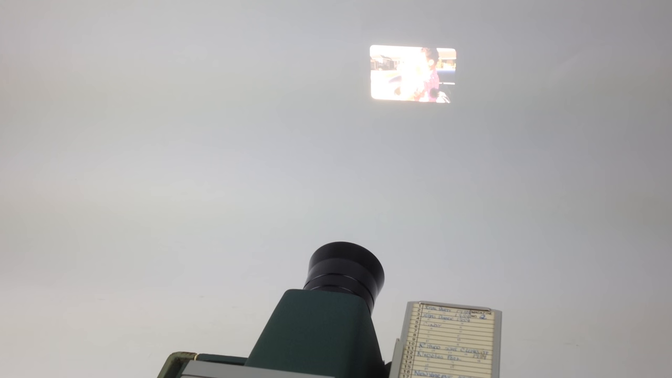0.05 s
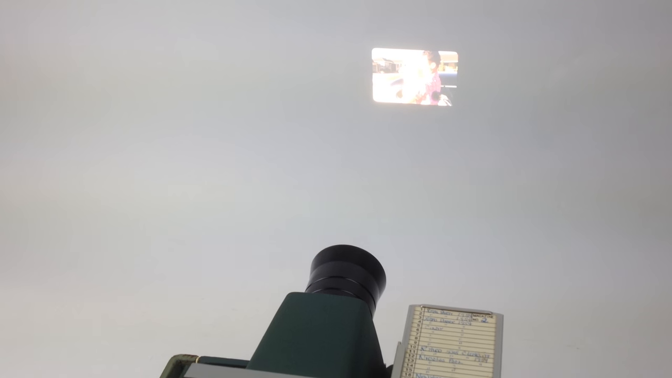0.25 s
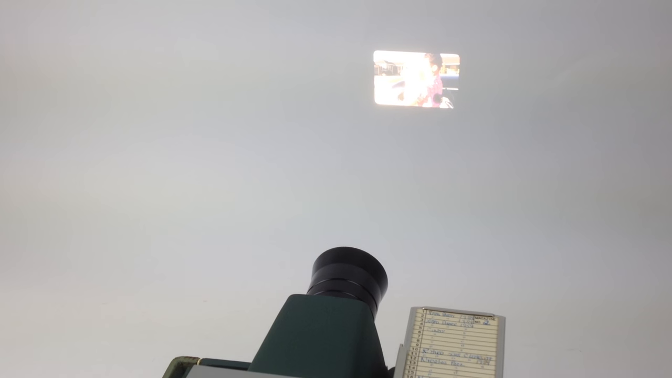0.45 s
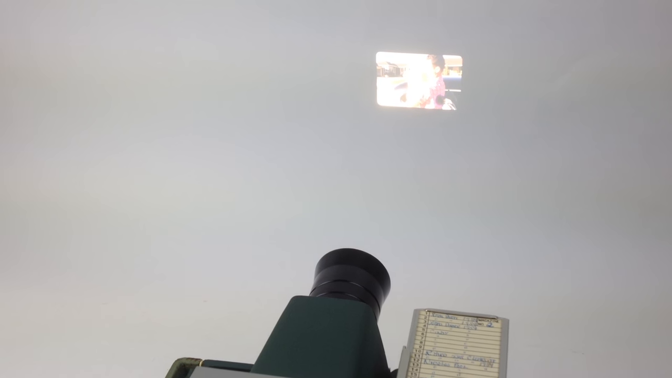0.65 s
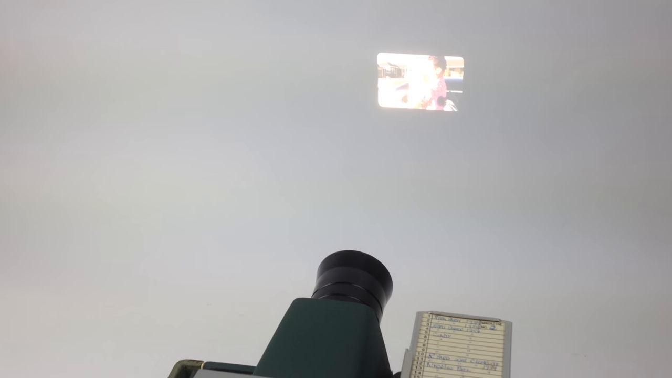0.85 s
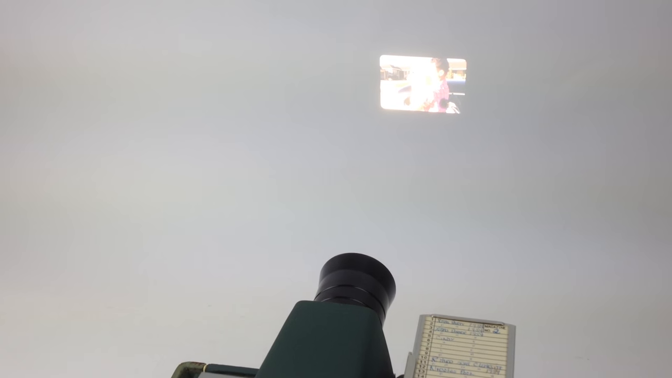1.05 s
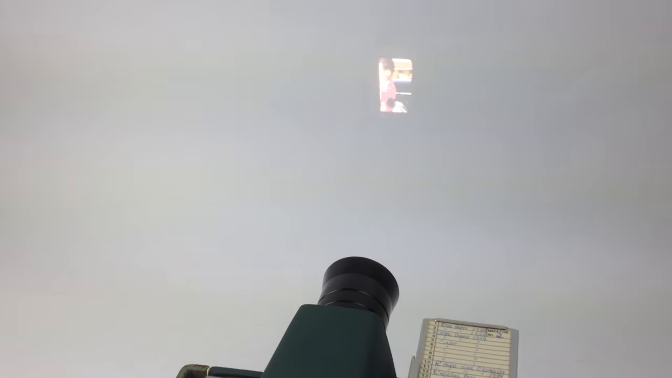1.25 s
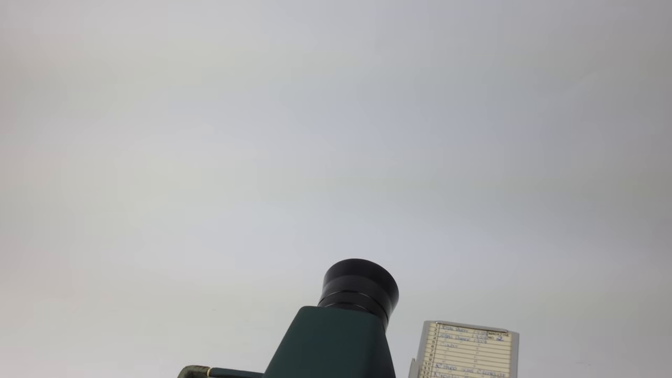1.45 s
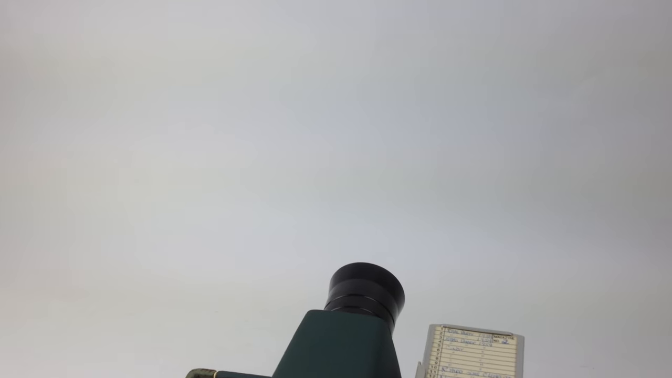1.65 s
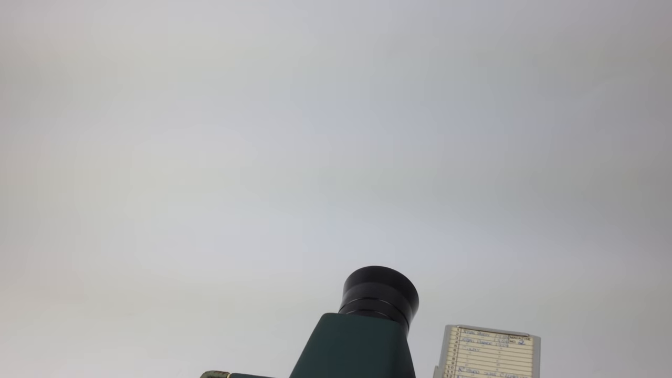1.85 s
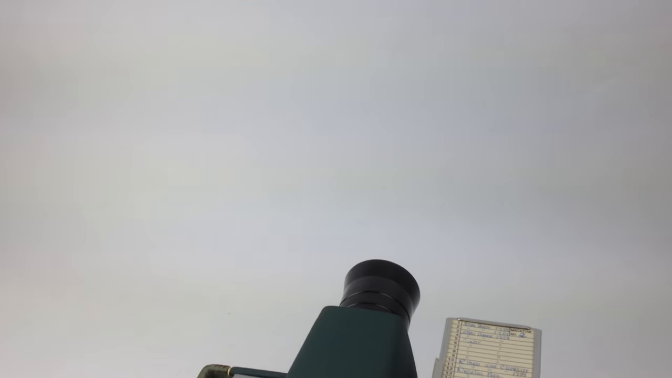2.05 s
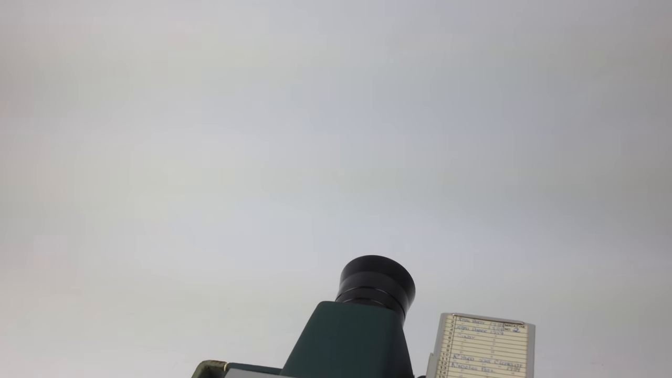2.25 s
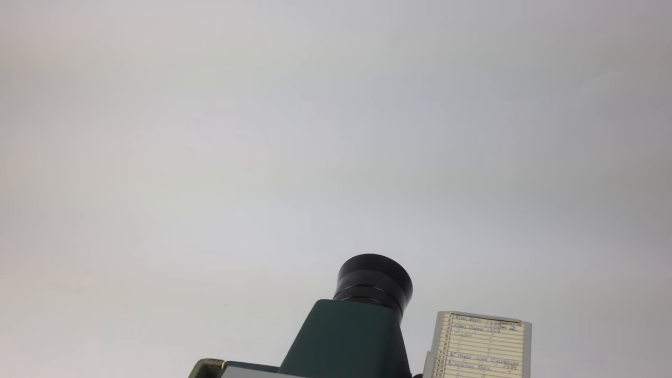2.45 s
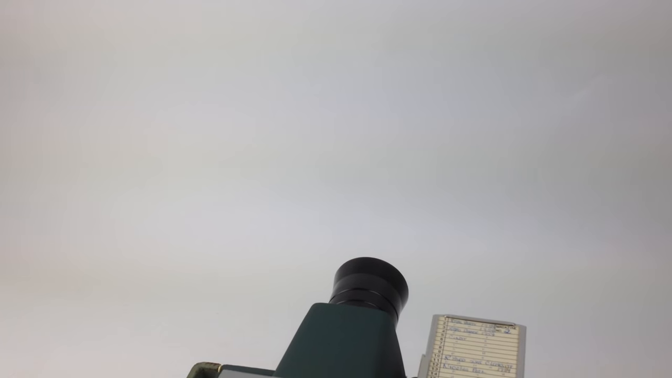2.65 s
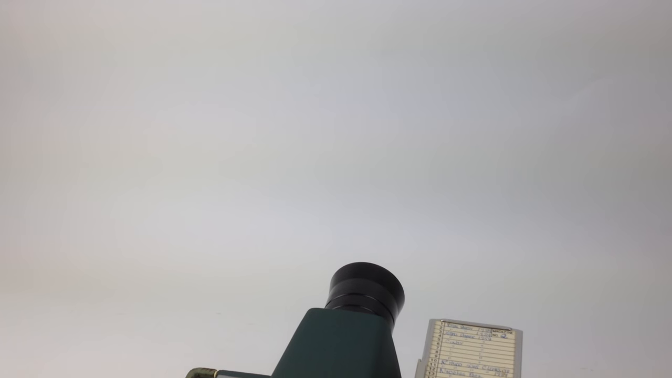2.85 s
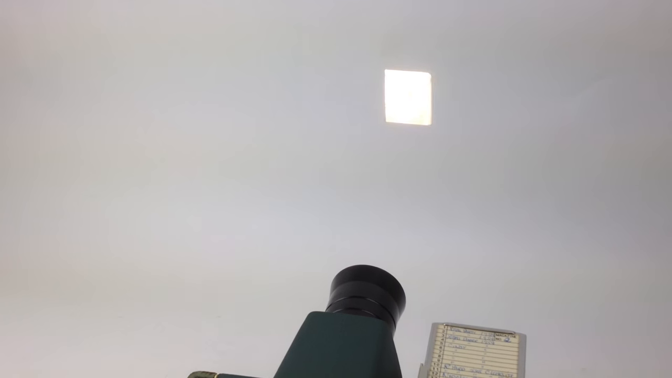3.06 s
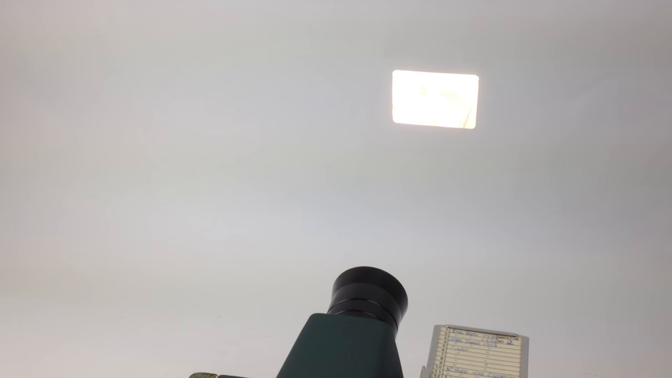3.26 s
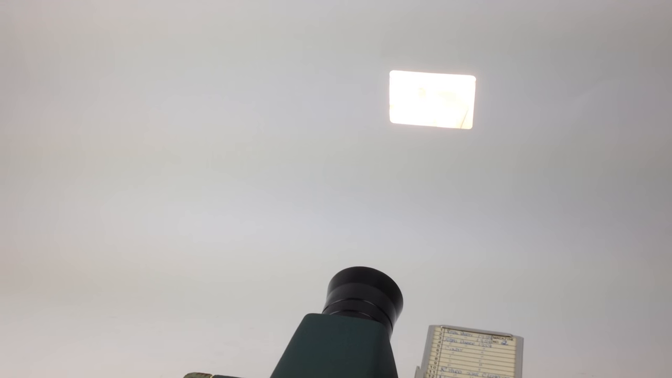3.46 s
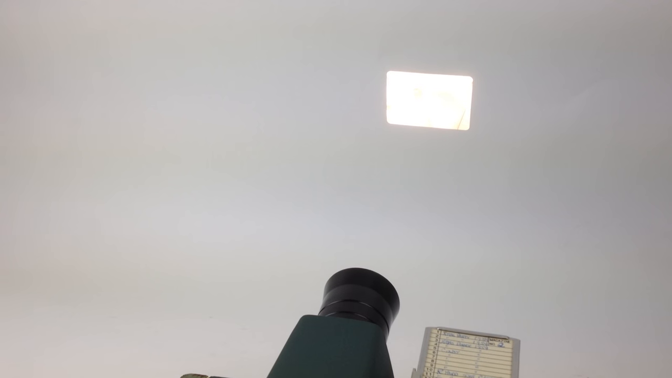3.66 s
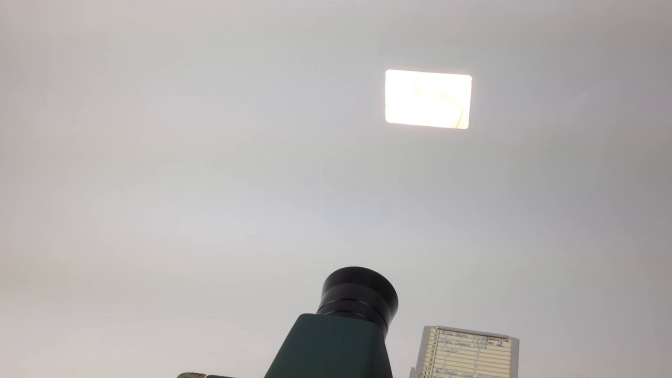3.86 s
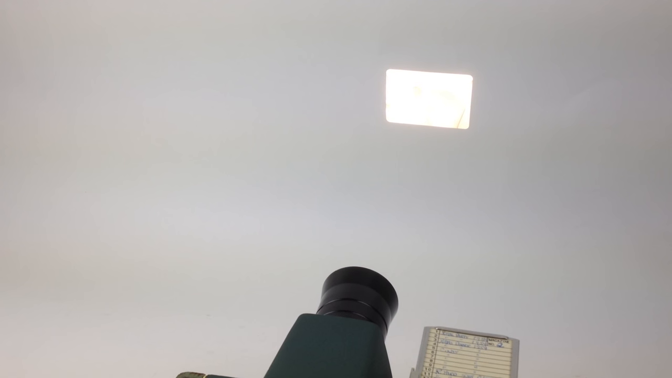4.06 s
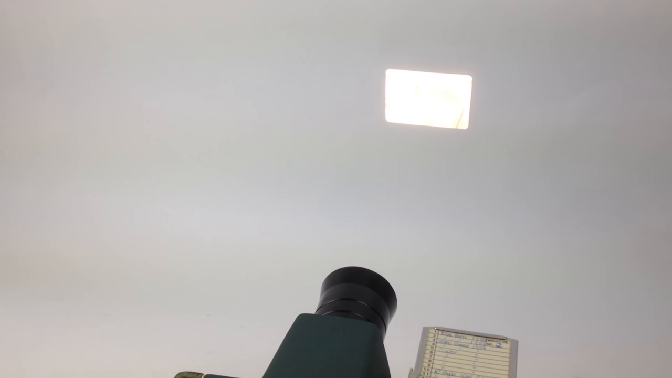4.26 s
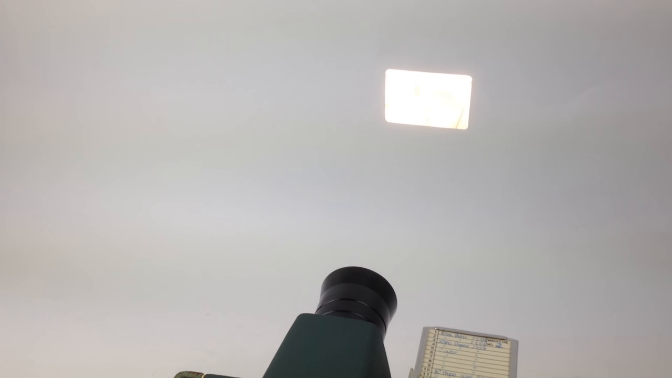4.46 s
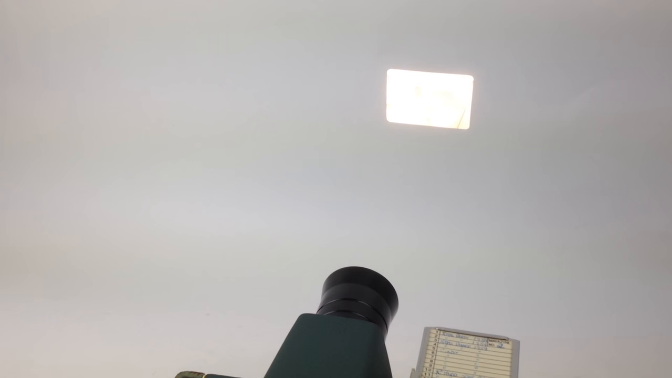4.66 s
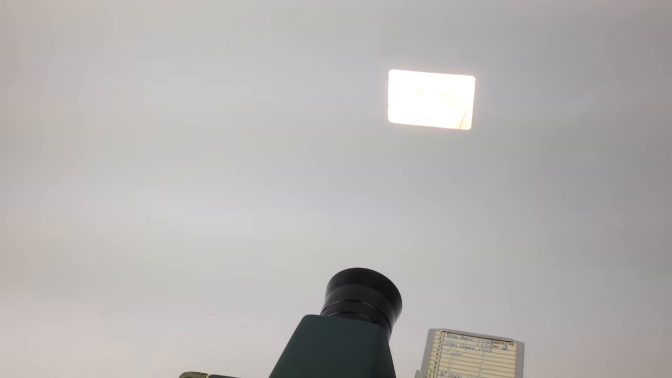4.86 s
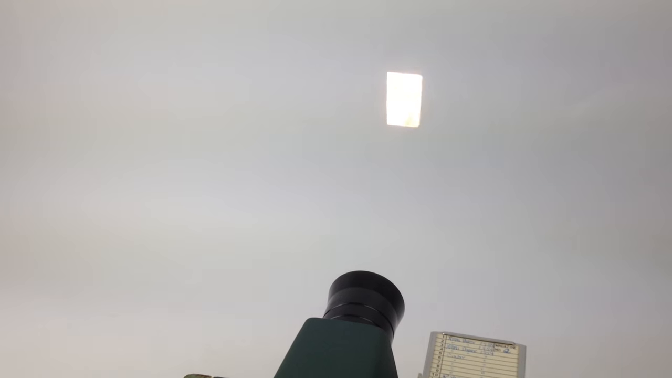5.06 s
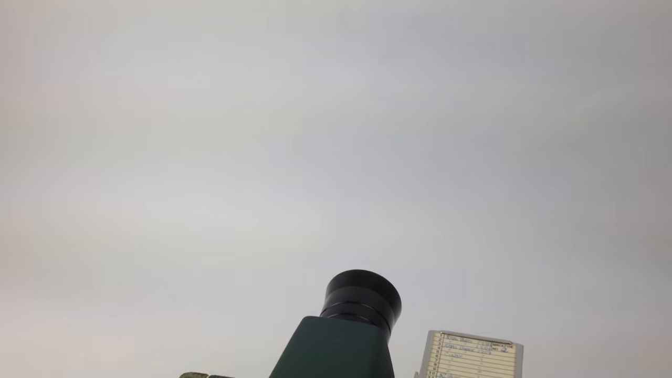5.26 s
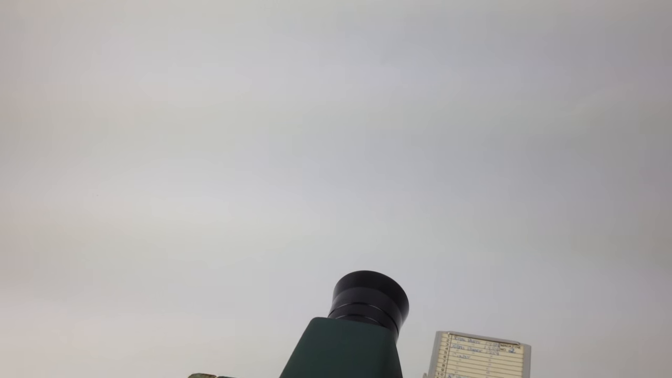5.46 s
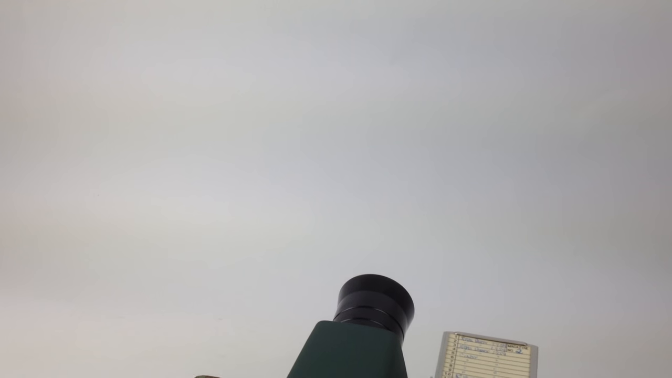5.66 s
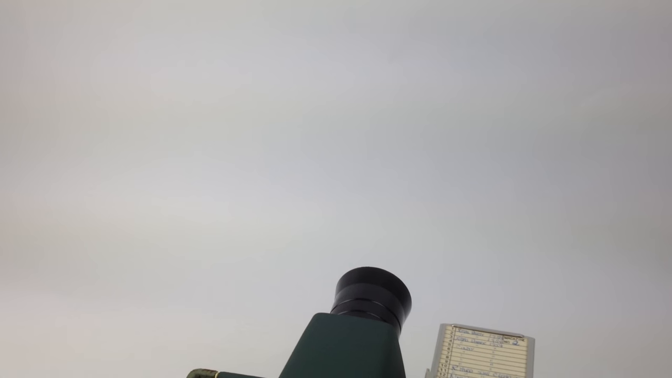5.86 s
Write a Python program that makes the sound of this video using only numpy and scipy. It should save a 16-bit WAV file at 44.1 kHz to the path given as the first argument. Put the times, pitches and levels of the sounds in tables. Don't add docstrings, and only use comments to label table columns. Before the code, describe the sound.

Constant fan whir with rushing air, heard up close indoors. A hand works the projector's sliding changer: small ticks and short dry scrapes lead into loud, bright metal slams with hollow case thuds and a brief plate ring. This happens three times, with only the fan between. Short room reflections follow the hits, and the microphone level ducks slightly after slams, then creeps back.

```python
import sys
import numpy as np
from scipy import signal
from scipy.fft import rfft, irfft
from scipy.io import wavfile
from scipy.ndimage import uniform_filter1d

SR = 44100
rng = np.random.default_rng(int(sys.argv[2]) if len(sys.argv) > 2 else 0)


def invert_db(x):
    u = np.asarray(x, float) / 20
    return 10 ** u


def generate_wav(sig):
    pcm = np.round(np.clip(np.atleast_2d(sig).T, -1, 1) * 32767).astype(np.int16)
    wavfile.write(sys.argv[1], SR, pcm)


N = 261072


def rms_one(x):
    return x / np.sqrt(np.mean(x ** 2) + 1e-20)


def peak_one(x):
    return x / np.max(np.abs(x))


def in_time(rows, outside):
    s, *columns = np.transpose(rows)
    t = np.arange(N) / SR
    return [np.interp(t, s, column, left=outside, right=outside) for column in columns]


def colour(x, spectrum, peaks=()):
    hz = np.maximum(np.arange(len(x) // 2 + 1) * SR / len(x), 1)
    points = np.array(spectrum)
    gain_db = np.interp(np.log(hz), np.log(points[:, 0]), points[:, 1])
    for centre_hz, width_hz, db in peaks:
        gain_db += db / (1 + (2 * (hz - centre_hz) / width_hz) ** 2)
    return irfft(rfft(x) * invert_db(gain_db), len(x))


def drift(rate_hz):
    r = np.exp(-80 * np.pi * rate_hz / SR)
    noise = rng.standard_normal(N // 40 + 2002)
    slow = signal.lfilter([1], [1, -2 * r, r * r], noise)[2000:]
    return np.interp(np.arange(N) / 40, np.arange(len(slow)), rms_one(slow))


def ring(x, hz, t60_s):
    r = invert_db(-60 / (t60_s * SR))
    w = 2 * np.pi * hz / SR
    return signal.lfilter([0, np.sin(w)], [1, -2 * r * np.cos(w), r * r], x + 1e-18)


def body(x, modes, spread_db):
    out = 0
    for k, (hz, db, t60_s) in enumerate(modes):
        strength = invert_db(db + spread_db * rng.standard_normal())
        out = out + strength * (-1) ** k * ring(x, hz, t60_s)
    return out


# start_s, peak_db, brightness_db, thump_db
BLOWS = [(0.7995, -22.5, -9, -14), (1.4332, -17.5, -21.5, -18), (1.494, -18, -17.5, -21),
         (1.8264, -13.5, -13.5, -9), (1.8413, -5, -20, -19), (1.8447, -1.5, -34, -18),
         (1.855, -13, -14, -32), (1.868, 1, -38, -32), (1.8728, -10.5, -8.5, -12), (3.026, -15.5, -32, -25),
         (3.0691, -3, -11.5, -24.5), (3.1008, -8.5, -13, -18), (3.1269, -11.5, -10, -19),
         (3.1576, -21.5, -18, -7), (3.187, -11.5, -9, -22), (3.1959, -2, -17.5, -10),
         (3.3401, -18.5, -9, -14), (5.2576, -15.5, -22, -25), (5.5823, -14, -21, -28),
         (5.5902, -13.5, -13.5, -8.5), (5.5963, -13.5, -11.5, -9), (5.613, -6.5, -17, -10),
         (5.619, -17, -13, -13), (5.6508, -16.5, -18, -5.5), (5.66, -7.5, -12.5, -16.5)]
BLOW_HZ, BLOW_MS = 4116, 3.5
# start_s, peak_db, brightness_db
TICKS = [(0.3206, -34, -42), (1.2241, -23.5, -48), (1.2966, -36, -23), (1.3034, -25.5, -16),
         (1.3155, -31, -7), (1.441, -27.5, -22), (1.6072, -35, -20), (1.7355, -27, -13), (1.7478, -24, -19),
         (1.803, -23, -27), (1.816, -22, -8), (1.8818, -22, -28), (2.7087, -35.5, -8), (2.7264, -38, -20),
         (2.817, -29, -24), (2.8794, -31.5, -35), (2.9495, -32.5, -8.5), (3.057, -38, -6),
         (5.017, -24, -12), (5.045, -30.5, -20), (5.1028, -31, -22), (5.1203, -30, -13),
         (5.1547, -29.5, -8), (5.3453, -28, -18), (5.4802, -35, -10), (5.5344, -32, -30)]
TICK_HZ, TICK_MS, TICK_THUMP_DB = 3800, 1.9, -11
# start_s, peak_db, pitch_hz
KNOCKS = [(1.3797, -37, 3080), (1.72, -33, 2550), (1.8193, -13, 2580), (2.8473, -32.5, 2970),
          (2.897, -32, 2630), (3.206, -14, 2420), (3.221, -20.5, 2420), (5.002, -28, 2520),
          (5.4152, -30.5, 2360), (5.511, -32.5, 2970), (5.6389, -16, 2400)]
KNOCK_MS, KNOCK_BRIGHT_DB, KNOCK_THUMP_DB = 4.6, -23.5, -18.5


def every_contact():
    blows = [(s, db, bright_db, BLOW_HZ, thump_db, BLOW_MS) for s, db, bright_db, thump_db in BLOWS]
    ticks = [(s, db, bright_db, TICK_HZ, TICK_THUMP_DB, TICK_MS) for s, db, bright_db in TICKS]
    knocks = [(s, db, KNOCK_BRIGHT_DB, hz, KNOCK_THUMP_DB, KNOCK_MS) for s, db, hz in KNOCKS]
    return blows + ticks + knocks


# pitch_hz, level_db, t60_s
CARRIER = [(2606, -5.5, 0.0063), (2703, -3.5, 0.0034), (3290, -1.5, 0.0029), (3842, 0.5, 0.0071),
           (4270, -1, 0.0026), (4890, -5.5, 0.0057), (4990, -14, 0.0067)]
# pitch_hz, level_db, t60_s
CASE = [(363, -8, 0.016), (427, -7, 0.017), (770, -5.5, 0.0099), (1016, -4.5, 0.012), (1337, -3, 0.011),
        (1670, -1.5, 0.0077), (2340, 1.5, 0.0081)]
# pitch_hz, level_db (per Hz)
SPARKLE = [(3000, -52), (5000, 20), (6000, 10), (6900, 14), (8500, 10), (10000, 7.5), (12000, 7),
           (13500, 1.5), (15500, 0.5)]
RATTLE_T60_S, RATTLE_DB = .12, -15


def contacts():
    out, size = np.zeros(N + SR), 8192
    t = np.arange(size) / SR
    thin = signal.butter(3, 2400, "high", fs=SR, output="sos")
    damped = signal.butter(3, 5600, fs=SR, output="sos")
    for s, db, bright_db, hz, thump_db, ms in every_contact():
        grit = rng.standard_normal(size) * (1.1 + rng.exponential(1, size))
        touch = 1.2 * np.exp(-t / .0005)
        chatter = grit * (np.exp(-t * 1000 / np.clip(ms, .3, 3.5)) + touch)
        rattle = grit * invert_db(RATTLE_DB - 60 * t / RATTLE_T60_S)
        chatter = (chatter + rattle) * (1 - np.exp(-t / 0.00027))

        sheet = peak_one(signal.sosfilt(thin, body(chatter, CARRIER, spread_db=2.0)))
        spot = peak_one(ring(np.diff(chatter, prepend=0), hz, .005))
        metal = signal.sosfilt(damped, sheet + .6 * spot)

        glints = [(glint_hz, 900, 4) for glint_hz in rng.uniform(5500, 13500, size=3)]
        edge = peak_one(colour(chatter * invert_db(-250 * t), SPARKLE, glints) * (t < .1))

        late = chatter * (1 - np.exp(-t / 0.007))
        thump = peak_one(body(late, CASE, spread_db=3.5))

        contact = peak_one(metal) + invert_db(bright_db + 9.5) * edge + invert_db(thump_db) * thump
        at = round(s * SR)
        out[at:at + size] += invert_db(db) * contact
    return out[:N]


# start_s, level_db
GATE_BLOWS = [
    (1.845, -22),
    (1.869, -23),
    (3.14, -25),
    (3.198, -16),
    (3.207, -18),
    (3.339, -33.5),
    (5.614, -28),
    (5.640, -25.5),
]
# pitch_hz, level_db, t60_s
GATE = [(2420, -4.5, 0.15), (2500, -7, 0.1), (742, -21, 0.089)]


def gate():
    blows, t = np.zeros(N), np.arange(1500) / SR
    for s, db in GATE_BLOWS:
        at = round(s * SR)
        shake = rng.standard_normal(len(t)) * np.exp(-t / 0.0066)
        blows[at:at + len(t)] += invert_db(db - 24.0) * shake
    return body(blows, GATE, spread_db=0)


# start_s, length_s, scrape_db, hiss_db
STROKES = [(1.224, 0.1, -47, -58), (1.296, 0.081, -43.5, -53.5), (1.374, 0.081, -39.5, -48),
           (1.436, 0.055, -46.5, -59), (1.71, .02, -44.5, -61), (1.728, 0.054, -40.5, -55),
           (1.768, 0.045, -45.5, -59), (1.81, 0.019, -41, -44), (2.80, 0.16, -55, -67.5),
           (2.929, 0.12, -46.5, -58), (3.019, 0.074, -40, -45), (3.082, 0.082, -30.5, -44),
           (4.978, 0.1, -50, -67), (5.085, 0.037, -43, -57.5), (5.115, 0.032, -44, -51.5),
           (5.145, 0.033, -41.5, -50), (5.194, 0.061, -40.5, -50.5), (5.267, 0.026, -44, -53.5),
           (5.468, 0.042, -45, -57), (5.502, 0.12, -49.5, -65.5), (5.579, 0.078, -34, -34.5)]
SCRAPE_CASE_DB = -9


def scrape():
    hits = rng.random(N) < 5000 / SR
    sizes = invert_db(1.9 * np.minimum(rng.exponential(1, N), 5))
    grains = hits * sizes * rng.choice([-1, 1], N)
    grains = grains * invert_db(1.5 * drift(60.0))
    metal = rms_one(body(grains, CARRIER, spread_db=6))
    metal = metal + invert_db(SCRAPE_CASE_DB) * rms_one(body(grains, CASE, spread_db=1))
    edge = rms_one(colour(grains, SPARKLE))
    out, t = np.zeros(N), np.arange(N) / SR
    for s, length, db, hiss_db in STROKES:
        corners_s = [s, s + .008, s + 0.91 * length, s + length + 0.0081]
        shape = np.interp(t, corners_s, [0.0011, 0.77, 0.83, 0.0036])
        out += shape * (invert_db(db) * metal + invert_db(hiss_db) * edge)
    return out


# start_s, length_s, pitch_hz, level_db (rms), overtone_db
SQUEAKS = [
    (1.348, 0.01, 4270, -32.5, -21.5),
    (1.379, 0.02, 3120, -42.5, -35),
    (5.201, 0.023, 4350, -46.5, -12),
    (5.203, 0.047, 3220, -42.5, -32),
]


def squeaks():
    out = np.zeros(N)
    for s, length, hz, db, overtone_db in SQUEAKS:
        t = np.arange(round(length * SR)) / SR
        waver = np.cumsum(0.058 * rng.standard_normal(len(t)))
        phase = 2 * np.pi * hz * t + waver
        tone = np.sin(phase) + invert_db(overtone_db) * (np.sin(2 * phase) + np.sin(3 * phase))
        swell = np.sin(np.pi * t / length) ** 0.56
        at = round(s * SR)
        out[at:at + len(t)] += 1.9 * invert_db(db) * tone * swell
    return out


# start_s, level_db
HANDLING = [
    (.3, -70),
    (.37, -55),
    (.42, -40.5),
    (.46, -58),
    (.52, -64),
]


def handling():
    rub = 0
    for hz, db, t60_s in CASE[:4]:
        rub = rub + invert_db(db) * ring(rng.standard_normal(N), hz, 1.4 * t60_s)
    return invert_db(in_time(HANDLING, -120)[0]) * rms_one(rub)


def room(x):
    t60_s, level_db = 0.2, -9.5
    t = np.arange(SR // 3) / SR
    white = rng.standard_normal(len(t))
    dull = signal.lfilter([.5], [1, -.5], white)
    tail = dull + (white - dull) * invert_db(-250 * t)
    tail = tail * invert_db(-60 * t / t60_s) * (1 - np.exp(-t / 0.0016))
    return invert_db(level_db) * signal.fftconvolve(x, tail / np.sqrt(np.sum(tail ** 2)))[:N]


BLADE_HZ = 185.8
# multiple of BLADE_HZ, level_db (rms)
BLADE_TONES = [(1, -56), (2, -56.5), (3, -68.5), (4, -66.5), (5, -70), (6, -64)]
# pitch_hz, level_db (rms)
MAINS = [(240, -68)]
# pitch_hz, level_db (per Hz)
AIR = [(59, -57), (100, -28), (156, -5.5), (213, -8), (539, -8.5), (651, -11), (1010, -6.5), (1640, -12),
       (3510, -8.5), (5000, -17), (6000, -28.5), (8800, -32.5), (9500, -40), (15300, -42)]
AIR_DB = -45
# pitch_hz, width_hz, level_db
HOUSING = [(356, 50, 4), (520, 220, 7), (583, 33, -15), (827.4, 46, 10.5), (1041, 42, 11.5), (1126, 13, 11),
           (1897, 37, -10), (1923, 50, 10), (2145, 230, -7), (2645, 300, 3.5), (3150, 90, -3.5),
           (3590, 300, 2.5), (4220, 1200, 5)]


def fan():
    t = np.arange(N) / SR
    phase = 2 * np.pi * np.cumsum(BLADE_HZ + 0.27 * drift(1.45)) / SR
    tones = 0
    for k, db in BLADE_TONES:
        tones = tones + invert_db(db + 0.68 * drift(24.0)) * np.sin(k * phase + k * k)
    buzz = sum(invert_db(db) * np.sin(2 * np.pi * hz * t) for hz, db in MAINS)
    air = rms_one(colour(rng.standard_normal(N), AIR, HOUSING))
    gusts_db = .4 * drift(4.0)
    return np.sqrt(2) * (tones + buzz) + invert_db(AIR_DB + gusts_db) * air


# start_s, length_s, pitch_hz, width_hz, level_db (rms)
RUSTLES = [
    (.2, .2, 8500, 500, -74),
    (.44, .2, 12000, 3500, -73),
]


def rustle():
    t, out = np.arange(N) / SR, 0
    for s, length, hz, width_hz, db in RUSTLES:
        edges_hz = [hz - width_hz / 2, hz + width_hz / 2]
        band = signal.butter(2, edges_hz, "band", fs=SR, output="sos")
        swell = np.sin(np.pi * np.clip((t - s) / length, 0, 1))
        hiss = rms_one(signal.sosfilt(band, rng.standard_normal(N)))
        out = out + invert_db(db) * swell * hiss
    return out


def scene():
    changer = contacts() + gate() + scrape() + squeaks() + handling()
    changer = signal.sosfilt(signal.butter(4, 260, "high", fs=SR, output="sos"), changer)
    return (changer + room(changer) + fan() + rustle())[None]


# pitch_hz, level_db (per Hz)
SELF_NOISE = [(20, -11), (60, 1.5), (150, -5), (1000, -25), (9000, -34), (15000, -14.5)]
SELF_NOISE_DB = -76.5


def microphone_noise():
    return invert_db(SELF_NOISE_DB) * rms_one(colour(rng.standard_normal(N), SELF_NOISE))


def gain_control(x):
    level_db = 10 * np.log10(uniform_filter1d(x[0] ** 2, size=400) + 1e-12)
    creep_db = 5.3 * np.arange(N) / SR
    held_db = np.maximum.accumulate(level_db + creep_db) - creep_db
    duck_db = -.4 * np.maximum(held_db + 16.5, 0)
    r = np.exp(-1 / (0.065 * SR))
    return x * invert_db(signal.lfilter([1 - r], [1, -r], duck_db))


def roll_off(x):
    return signal.sosfilt(signal.butter(12, 16360, fs=SR, output="sos"), x)


def record(dry):
    x = gain_control(dry + microphone_noise())
    size = np.abs(x)
    rounded = np.sign(x) * (.6 + .33 * np.tanh((size - .6) / .33))
    x = np.where(size > .6, rounded, x)
    x = signal.sosfilt(signal.ellip(8, 1, 70, 15100, fs=SR, output="sos"), x)
    return roll_off(x)


dry = scene()
out = record(dry)
generate_wav(out)
```